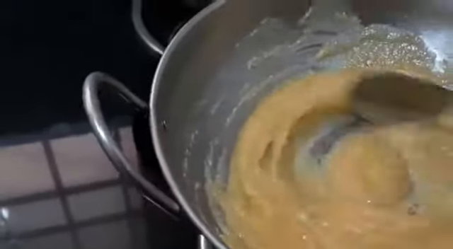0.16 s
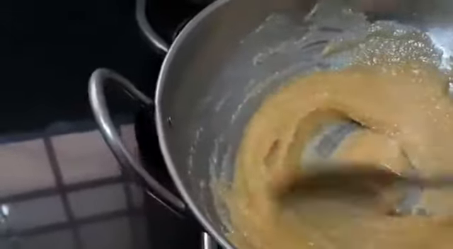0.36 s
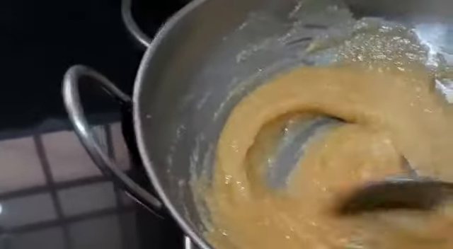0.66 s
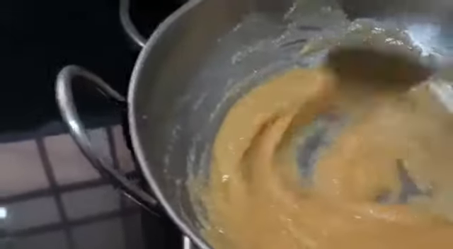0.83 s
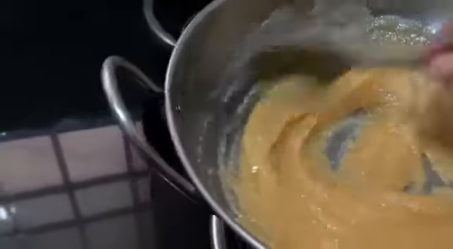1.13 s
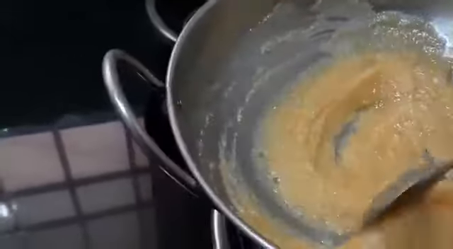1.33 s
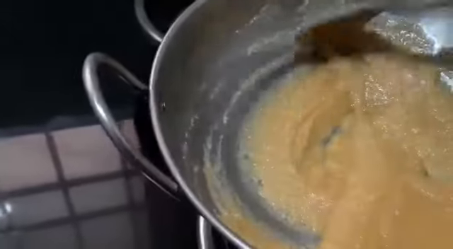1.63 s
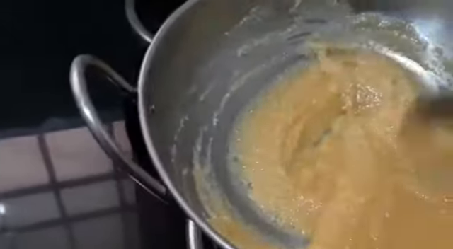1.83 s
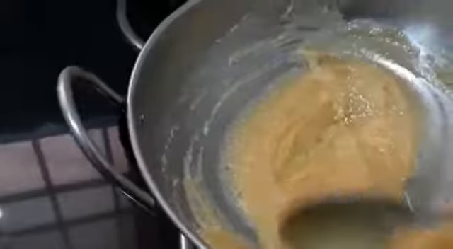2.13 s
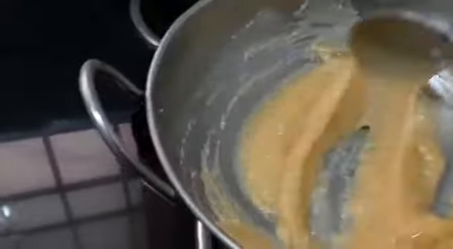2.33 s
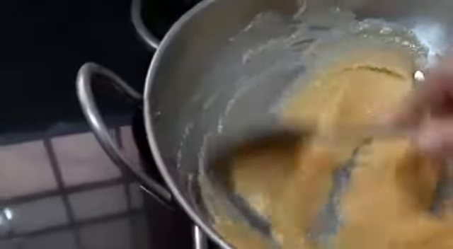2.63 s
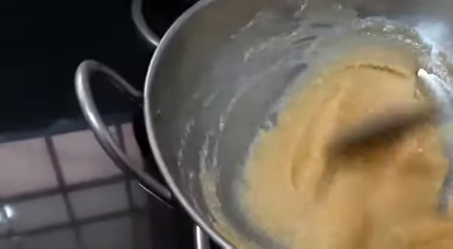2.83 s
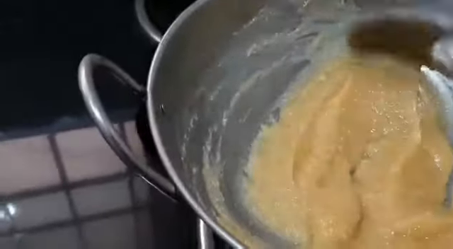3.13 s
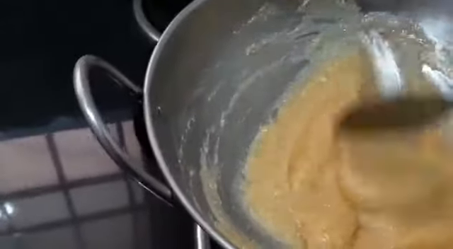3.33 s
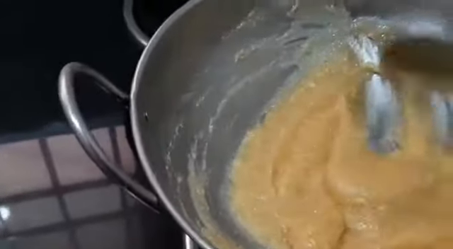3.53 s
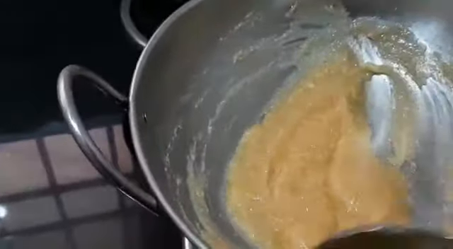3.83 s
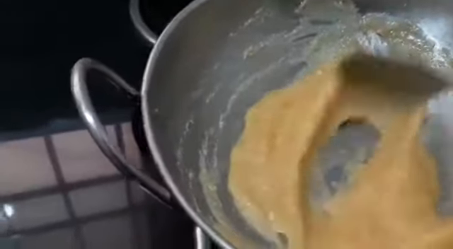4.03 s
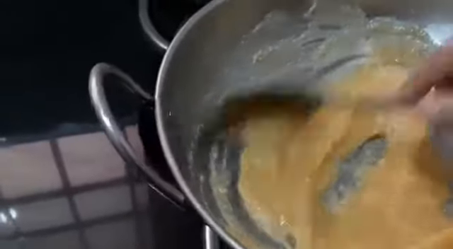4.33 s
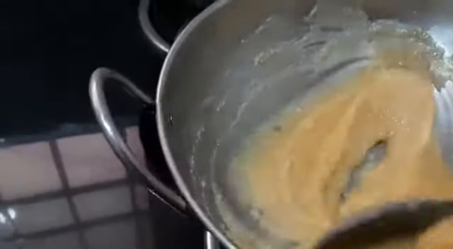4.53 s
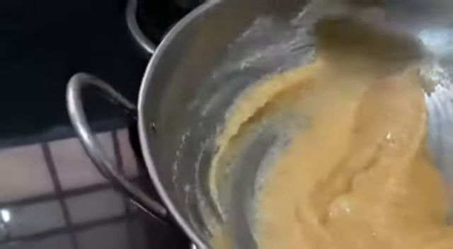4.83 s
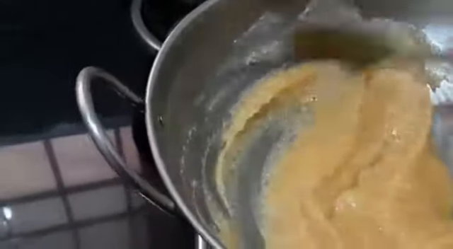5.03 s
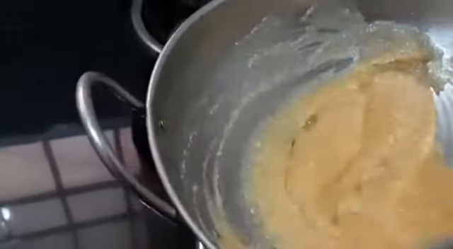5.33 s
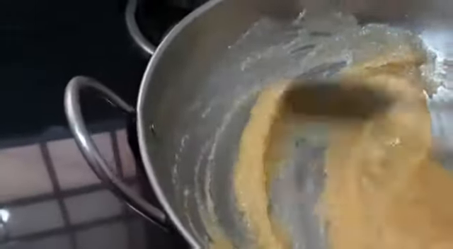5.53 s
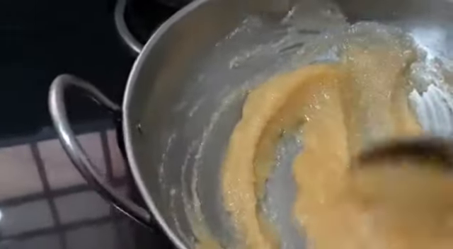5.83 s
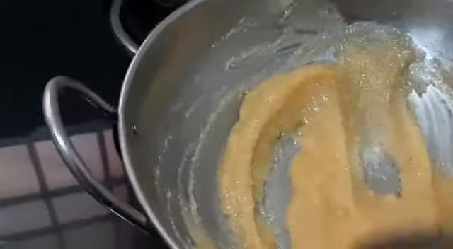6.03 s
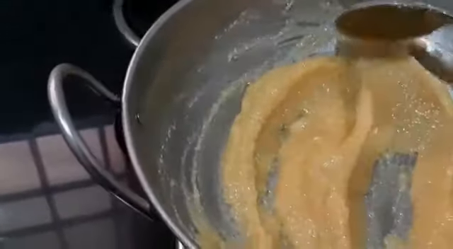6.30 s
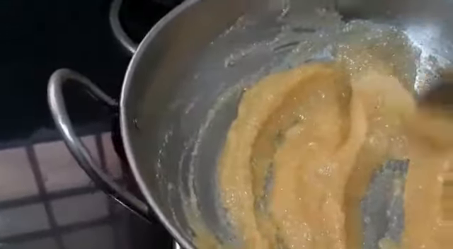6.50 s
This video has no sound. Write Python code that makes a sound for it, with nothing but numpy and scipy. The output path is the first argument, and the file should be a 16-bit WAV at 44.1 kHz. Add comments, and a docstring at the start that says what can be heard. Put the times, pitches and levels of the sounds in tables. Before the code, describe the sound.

In a bare, tiled kitchen, a steel spoon drags through thick paste, its edge rasping on the steel pan. A soft tap and a brief thin hiss follow. Then the stirring settles into an even rhythm of knocks and duller taps, with short scrapes between. The microphones are close: three hard knocks add a low thump on the left, and air puffs brush the right. The room rings briefly over a faint low noise.

```python
"""A bare, tiled kitchen; two microphones close to a steel pan in which a steel spoon stirs thick paste.
First the spoon drags through the paste, its edge biting down to the metal. At 1 s it lands softly, and
a thin hiss follows. From 1.6 s it knocks on the near wall and lands softly on the far one, a touch about
every 0.4 s with scrapes between. Three hard knocks jolt the left microphone; puffs of air brush the
right. A last drag ends it at 6.6 s. Throughout, the room rings after every touch, over a low noise."""
import sys
import numpy as np
from scipy import signal
from scipy.fft import rfft, irfft
from scipy.io import wavfile
from scipy.ndimage import uniform_filter1d, minimum_filter1d

SR = 44100
rng = np.random.default_rng(int(sys.argv[2]) if len(sys.argv) > 2 else 0)


def inscribe(sig):
    """Save sig as 16-bit PCM at rate SR to the path in sys.argv[1].

    A 1-D sig is mono; a 2-D sig holds one channel per row.
    Samples are clipped to [-1, 1] before scaling.
    """
    pcm = np.round(np.clip(np.atleast_2d(sig).T, -1, 1) * 32767)
    wavfile.write(sys.argv[1], SR, pcm.astype(np.int16))


N = 293706
TIME = np.arange(N) / SR

# spoon meets pan, close to the microphones:
# start_s, level_db, cushion_db_per_octave, low_ring_hz, high_ring_hz, ring_db, left_minus_right_db
SPOON_BLOWS = [(1.0048, 12.5, 6.5, 1580, 4400, 5, 5), (1.6161, 16.5, 5, 293, 3220, 11, 2),
               (2.1050, 24.5, 1.39, 2590, 7700, 7.2, 12.5), (2.4338, 16.5, 5.5, 1490, 7850, 7, 4.5),
               (3.0536, 17.5, 6.5, 1850, 3640, 3, 1.5), (3.4693, 21.5, 4.0, 315, 6960, 4.4, 5),
               (3.8689, 25, 0.5, 2320, 7900, 3.7, 16.5), (4.1995, 7, 4.5, 1280, 1600, 2, 1),
               (4.6207, 22.5, 2, 1610, 2670, 7.6, -3.5), (4.9611, -0.5, 5, 1300, 1540, 6, 3),
               (5.3874, 20.5, -0.37, 2620, 5930, 6.6, 12), (5.6893, 8, 7, 700, 1270, 13, 2),
               (6.0155, 22, 0.3, 2680, 4850, 5.2, 12), (6.3513, 19, 5.5, 358, 1950, 6.9, 4.5)]
# spectrum of a blow on bare steel: frequency_hz, level_db
BARE_STEEL = [(40, -22.5), (120, -1), (180, -7), (320, 1.5), (500, -5.5), (1400, -4), (2650, -2.5),
              (3700, -5), (4700, -3), (10000, -5.5), (16000, -7.5)]
def blows(chatter_s=0.0036, cushion_from_hz=374, mode_spread=0.44, mode_share=0.84, ring_width=0.24):
    """A blow is a few ms of steel chatter, dulled by paste; where it lands decides which modes speak."""
    out, t = np.zeros((1, N)), np.arange(4096) / SR
    for start, db, cushion, low_hz, high_hz, ring_db, _ in SPOON_BLOWS:
        weights = mode_share * np.maximum(1 + mode_spread * rng.standard_normal(len(PAN_MODES)), 0)
        chatter = rfft(rng.standard_normal(len(t)) * np.exp(-(t / chatter_s) ** 1.38))
        chatter /= np.sqrt(uniform_filter1d(abs(chatter) ** 2, size=14))  # equal force in all bands
        burst = irfft(chatter) * (t < .02)

        def tone_db(hz):
            paste_loss = cushion * np.log2(np.maximum(hz / cushion_from_hz, 1))
            ring = ring_db * sum(peak(hz / f, 0.96, ring_width) for f in (low_hz, high_hz))
            return db + read(BARE_STEEL, hz) - paste_loss + pan_db(hz, weights) + ring
        add(out, start, colour(burst[None], tone_db))
    return out


# damped modes of pan and spoon: pitch_hz, width_hz, level_db
PAN_MODES = [(530, 182, 6.5), (837, 180, 5), (1270, 52, 4), (1526, 36, 7), (1685, 49, 7), (2020, 100, 3.5),
             (2404, 18, -1), (2700, 11, -2), (2770, 93, 5.5), (2700, 27, 2.5), (3563, 46, 6.5),
             (4460, 160, 6.5), (5490, 570, 8.5), (5570, 123, -19.5), (6100, 25, -4), (6600, 42, 0.5),
             (7350, 250, -3.5), (8530, 1000, 4.5), (12020, 220, 7)]
def pan_db(hz, weights):
    """The steel's modes raise peaks and cut notches in the spectrum of a touch."""
    return sum(w * db * peak(hz, f, width) for w, (f, width, db) in zip(weights, PAN_MODES)) - 1.5


# spectrum of the spoon sliding in the pan: frequency_hz, level_db
SCRAPE_SPECTRUM = [(20, -30), (60, -18), (150, -12.5), (330, -8.5), (650, -6.5), (1030, -10.5),
                   (1450, -8.5), (2200, -9.5), (2900, -12), (3700, -15), (4800, -11), (8500, -14.5),
                   (10500, -16), (13000, -14.5), (16000, -18.5)]
def friction(slips_per_s=5000, spread_db=1.5, patch_db=2.5, judder_db=0.5):
    """Tiny slips under the spoon ring its bowl and the pan; the moving contact shifts the colour."""
    slipping = rng.random(N) < slips_per_s / SR
    size = np.minimum(rng.exponential(1, N), 5)
    slips = slipping * amp(spread_db * size) * rng.choice([-1, 1], N)
    judder = unit(uniform_filter1d(uniform_filter1d(rng.standard_normal(N), 400), 200))
    grain = unit(unit(slips) + .5 * rng.standard_normal(N))
    steps = TIME[::64]
    pressure, bright_db, rasp_db = stirring(steps)
    drive = grain * np.interp(TIME, steps, pressure) * amp(judder_db * judder)
    hz, t, bands = signal.stft(drive, SR, nperseg=1024)
    hz = hz[:, None]
    patches = uniform_filter1d(rng.standard_normal(bands.shape), 20, axis=0)
    patches = unit(uniform_filter1d(patches, 4, axis=1))  # smooth in frequency and time
    treble = read([(1800, 0.041), (4500, 0.62)], hz) * np.interp(t, steps, bright_db)
    rasp = read([(1600, 0.047), (2500, 0.84), (3500, 0.88), (4800, 0.14)], hz)
    rasp = rasp * np.interp(t, steps, rasp_db)
    bands *= amp(treble + rasp + spoon_bowl_db(hz, t) + patch_db * patches)
    scrape = signal.istft(bands, SR)[1][None, :N]
    return amp(10.5) * colour(scrape, lambda f: read(SCRAPE_SPECTRUM, f) + pan_db(f, [.75] * len(PAN_MODES)))


# the spoon drags through the paste: start_s, length_s, pressure_db, low_bowl_hz, high_bowl_hz
PASTE_DRAGS = [(-0.03, 0.36, -39, 530, 1680), (0.22, 0.45, -39.5, 702, 1320),
               (0.672, 0.075, -45, 604, 1390), (1.008, 0.12, -50.5, 533, 1590),
               (1.198, 0.12, -44.5, 540, 1230), (1.31, 0.35, -66, 540, 1220),
               (1.645, 0.24, -42.5, 587, 1520), (2.546, 0.15, -42.5, 824, 1470),
               (3.096, 0.16, -43, 730, 1410), (3.485, 0.16, -41.5, 620, 1190),
               (4.216, 0.18, -42.5, 610, 1550), (4.973, 0.2, -50.5, 523, 1460),
               (5.698, 0.11, -43, 700, 1210), (6.385, 0.23, -48, 543, 1580)]
# its edge bites through to the metal: start_s, length_s, pressure_db, bright_db, rasp_db
EDGE_BITES = [(-0.015, 0.087, -49, 20, 17), (0.073, 0.039, -44, 25.5, 20.5), (0.103, 0.058, -40, 20, 8.5),
              (0.19, 0.07, -53, 5, 25), (0.254, 0.056, -42, 12.5, 21), (0.3, 0.14, -42.5, 17, 10.5),
              (0.429, 0.052, -41, 24, 8), (0.486, 0.16, -51, 21, 11), (0.59, 0.055, -40.5, 0, 18),
              (0.67, 0.044, -43, 19, 16), (0.712, 0.054, -34.5, 9.5, 11.5), (0.763, 0.02, -33.5, 19, -12),
              (1.063, 0.043, -44.5, 4.5, 2.5), (1.206, 0.065, -35, 8, -2), (1.723, 0.059, -47.5, 18, 7),
              (1.806, 0.053, -41.5, 18.5, 6.5), (2.457, 0.14, -54, 13.5, 2), (2.559, 0.051, -47, 23.5, -7),
              (2.605, 0.064, -48, 18, -13), (3.113, 0.11, -45, 6, 12.5), (3.16, 0.05, -38.5, 16, 1),
              (3.555, 0.073, -40, 22.5, -2), (4.24, 0.12, -45, 21, -4.5), (4.986, 0.052, -47, 9.5, 10.5),
              (5.109, 0.037, -38.5, 14, 2), (5.733, 0.054, -38.5, 11, -6), (6.409, 0.042, -48, 16.5, 6),
              (6.5, 0.077, -45, 21, -2)]
def stirring(t):
    """Pressure, brightness (dB) and rasp (dB) of the contact: drags and bites add up in power."""
    contacts = []
    for start, length, db, *_ in PASTE_DRAGS:
        pressure = amp(db) * push(t, start, length, attack_s=0.024, release_s=0.016, sag_db_per_s=8)
        contacts.append([pressure, pressure * amp(7), pressure * amp(1)])  # paste keeps a drag dull
    for start, length, db, bright_db, rasp_db in EDGE_BITES:
        pressure = amp(db) * push(t, start, length, attack_s=0.029, release_s=0.0097, sag_db_per_s=11)
        contacts.append([pressure, pressure * amp(bright_db), pressure * amp(rasp_db)])
    power, treble, rasp = np.square(contacts).sum(axis=0) + 1e-12
    return np.sqrt(power), 10 * np.log10(treble / power), 10 * np.log10(rasp / power)


def spoon_bowl_db(hz, t, lift_db=9, width=0.39):
    """The spoon's bowl has two hollow resonances, which move with each drag."""
    starts, _, _, *centres = np.transpose(PASTE_DRAGS)
    return lift_db * sum(peak(hz / latest(starts, centre, t), 0.97, width) for centre in centres)


def push(t, start_s, length_s, attack_s, release_s, sag_db_per_s):
    """An envelope like a hand's push: it leans in, holds while easing a little, and lets go."""
    age = t - start_s
    ramp = np.clip(age / attack_s, 0, 1) * np.clip(1 - (age - length_s) / release_s, 0, 1)
    return np.sin(np.pi / 2 * ramp) ** 2 * amp(-sag_db_per_s * np.clip(age, 0, length_s))


# small ticks at the pan: start_s, level_db
PAN_TICKS = [(0.092, -3), (0.683, -1), (0.797, 1.5), (2.989, -19)]
def ticks(decay_s=0.0013):
    """Tiny bursts of noise, strongest in the midrange."""
    out, t = np.zeros((1, N)), np.arange(4096) / SR
    spectrum = [(200, -8), (1200, -0.5), (8000, -22), (16000, -24)]
    for start, db in PAN_TICKS:
        click = rng.standard_normal((1, len(t))) * np.exp(-t / decay_s)
        add(out, start, colour(click / np.linalg.norm(click), lambda hz: db + read(spectrum, hz)))
    return out


def thin_hiss(centre_hz=6100, width_hz=1200, level_db=-52):
    """A narrow hiss, as of steam leaving the paste, while the spoon is lifted."""
    hiss = colour(rng.standard_normal((1, N)), lambda hz: 20 * np.log10(peak(hz, centre_hz, width_hz)))
    swell = push(TIME, start_s=1.295, length_s=0.23, attack_s=0.034, release_s=0.06, sag_db_per_s=20)
    return unit(hiss) * amp(level_db) * swell


def kitchen(x, direct_db, side_db, turns_per_s=.9, places=4):
    """Direct sound plus the room; the reflections change as the spoon moves round the pan."""
    direct_tone = [(300, -9), (700, -5.5), (1500, 2.5), (4000, -3.5), (7500, 5.5), (14000, 3.5)]
    direct = colour(x, lambda hz: direct_db + read(direct_tone, hz))[0]
    out = np.array([np.roll(direct, 1) * amp(side_db / 2), direct * amp(-side_db / 2)])
    booms = standing_waves()
    for place in range(places):
        away = (TIME * turns_per_s * places - place + places / 2) % places - places / 2
        share = np.cos(np.pi / 2 * np.clip(away, -1, 1))
        out += signal.oaconvolve(x * share, reflections() + booms, axes=1)[:, :N]
    return out


# reverberation off the tiled walls: frequency_hz, t60_s
TILE_DECAY = [(100, 0.53), (300, 0.69), (700, 0.46), (1400, 0.49), (2600, 0.46), (4600, 0.4), (8000, 0.4),
              (14000, 0.32)]
def reflections(spacing_m=0.18, build_s=0.0017, bass_db=-4, hold_s=0.0061):
    """The room's answer from one place in the pan; microphones 18 cm apart share its long waves."""
    t = np.arange(SR) / SR
    density = np.minimum(.3 + 6 * t, 1)
    echoes = rng.standard_normal((2, SR)) * (rng.random((2, SR)) < density) / np.sqrt(density)
    hz, when, (left, right) = signal.stft(echoes, SR, nperseg=256)
    hz = hz[:, None]
    coherence = np.sinc(2 * hz * spacing_m / 343)
    bands = np.array([left, coherence * left + np.sqrt(1 - coherence ** 2) * right])
    t60 = read(TILE_DECAY, hz)
    fall_db = -60 * (np.hypot(when, hold_s) - hold_s) / t60  # the room fills before it dies away
    bands *= amp(fall_db + read([(300, bass_db), (600, 0)], hz)) / np.sqrt(t60)
    tail = signal.istft(bands, SR)[1][:, :SR] * np.clip((t - .003) / build_s, 0, 1)
    return tail * amp(-2.5) * sides(1.9) / np.linalg.norm(tail, axis=1, keepdims=True)


# standing waves between the walls: pitch_hz, t60_s, level_db, right_microphone_lag_rad
ROOM_MODES = [(115.5, 0.31, 6.5, 0.27), (218.6, 0.41, 2, 0.22), (266.5, 0.34, -0.5, 0.26),
              (314.3, 0.23, 2, 0.47)]
def standing_waves():
    """Low room modes swell after a touch, then die; each meets the two microphones out of step."""
    t, out = np.arange(SR) / SR, np.zeros((2, SR))
    for hz, t60, db, lag in ROOM_MODES:
        rate = np.log(1000) / t60
        swell = 2 * rate ** 2 / SR * t * np.exp(-rate * t)
        out += amp(db) * swell * np.sin(2 * np.pi * hz * t - np.array([[0], [lag]]))
    return sides(0.88) * out


# jolts felt by the left microphone: start_s, level_db, final_pitch_hz
MICROPHONE_JOLTS = [(2.1035, -2.5, 57.5), (3.868, -6.5, 55), (6.014, -18, 46)]
def thumps(decay_s=0.0097, start_hz=210, settle_s=0.004):
    """A jolt is a low thump that sinks in pitch, almost all on the left."""
    out, t = np.zeros((2, N)), np.arange(SR // 4) / SR
    envelope = np.exp(-t / decay_s) * (1 - np.exp(-t / 0.00026))
    for start, db, final_hz in MICROPHONE_JOLTS:
        cycles = np.cumsum(final_hz + (start_hz - final_hz) * np.exp(-t / settle_s)) / SR
        add(out, start, amp([[db], [db - 23]]) * np.sin(2 * np.pi * cycles) * envelope)
    return out


# air on the right microphone: start_s, length_s, level_db
AIR_PUFFS = [(0.506, 0.066, -52), (2.877, 0.074, -41), (2.944, 0.11, -39.5), (4.59, 0.06, -43),
             (4.632, 0.05, -31), (4.713, 0.083, -30), (4.763, 0.12, -42.5)]
def puffs():
    """Soft gusts brush the microphone and make a brief rumble."""
    out = np.zeros((2, N))
    spectrum = [(20, -11), (55, 2), (110, -3), (200, -20), (500, -28), (2000, -48)]
    wind = colour(rng.standard_normal((1, N)), lambda hz: read(spectrum, hz))[0]
    for start, length, db in AIR_PUFFS:
        gust = unit(wind[round(start * SR):][:round(length * SR)])
        add(out, start, amp([[db - 20], [db]]) * gust * signal.windows.tukey(len(gust), .5))
    return out


# the quiet kitchen behind the pan: frequency_hz, level_db
ROOM_TONE_SPECTRUM = [(20, -24), (60, 14.5), (110, 25.5), (200, 11), (500, 10.5), (1200, -73), (3000, -9.5),
                      (6000, -10), (16000, -16.5)]
# its slow rise and fall: time_s, level_db
ROOM_TONE_SWELL = [(0, 1), (.9, 5), (1.6, 8), (2.8, 5), (3.4, 0), (4.3, -1.5), (5.3, -0.5), (6.66, 4)]
def room_tone(level_db=-68):
    """Low noise of stove and kitchen, partly shared by the two microphones."""
    noise = rng.standard_normal((2, N))
    rumble = colour(noise + noise[::-1] / 2, lambda hz: read(ROOM_TONE_SPECTRUM, hz))
    return amp(level_db + np.interp(TIME, *np.transpose(ROOM_TONE_SWELL))) * unit(rumble)


def amp(db):
    """Decibels to gain."""
    return 10 ** (np.asarray(db) / 20)


def unit(x):
    """Scales to rms 1."""
    return x / np.sqrt(np.mean(x ** 2) + 1e-20)


def read(points, hz):
    """Reads a curve on a log-frequency axis."""
    f, value = np.transpose(points)
    return np.interp(np.log(hz + 1), np.log(f), value)


def peak(hz, centre, width):
    """A resonance curve of height 1."""
    return 1 / (1 + (2 * (hz - centre) / width) ** 2)


def sides(db):
    """Left and right gains for a level difference."""
    return amp(np.array([[db], [-db]]) / 2)


def add(mix, start_s, sound):
    """Mixes a sound in at its start time."""
    part = mix[:, max(round(start_s * SR), 0):][:, :sound.shape[-1]]
    part += sound[..., :part.shape[-1]]


def colour(x, db):
    """Causal filter with the gain db(hz)."""
    log_gain = np.log(amp(db(abs(np.fft.fftfreq(4096, 1 / SR)))))
    taps = np.fft.ifft(np.exp(np.conj(signal.hilbert(log_gain)))).real
    return signal.oaconvolve(x, taps[None], axes=1)[:, :x.shape[1]]


def latest(starts, values, t, lead_s=.005):
    """At each time t, the value of the event that began last."""
    return np.asarray(values)[np.maximum(np.searchsorted(starts, t + lead_s) - 1, 0)]


def scene():
    """The pan, left of centre, sounds through the kitchen; thumps and puffs act on the microphones."""
    starts, *_, side_db = np.transpose(SPOON_BLOWS)
    knocks = kitchen(blows() + ticks(), direct_db=-6.5, side_db=latest(starts, side_db, TIME))
    scrapes = kitchen(friction() + thin_hiss(), direct_db=-3.5, side_db=4.0)
    return knocks + scrapes + thumps() + puffs() + room_tone()


def record(dry, ceiling=0.79, recover_db_per_s=260, bass_cut_hz=36, treble_cut_hz=15900):
    """The microphones drop the lowest bass, a limiter holds down hard knocks, the top treble is cut."""
    dry = signal.sosfilt(signal.butter(2, bass_cut_hz, "highpass", fs=SR, output="sos"), dry)
    over_db = np.maximum(20 * np.log10(abs(dry).max(0) / ceiling + 1e-9), 0)
    recovery_db = TIME * recover_db_per_s
    held_db = np.maximum.accumulate(over_db + recovery_db) - recovery_db
    gain = uniform_filter1d(minimum_filter1d(amp(-held_db), size=41), size=41)
    lowpass = signal.firwin(511, treble_cut_hz, window=("kaiser", 9), fs=SR)
    return signal.oaconvolve(dry * gain, lowpass[None], "same", axes=1)


dry = scene()
out = record(dry)
inscribe(out)
```